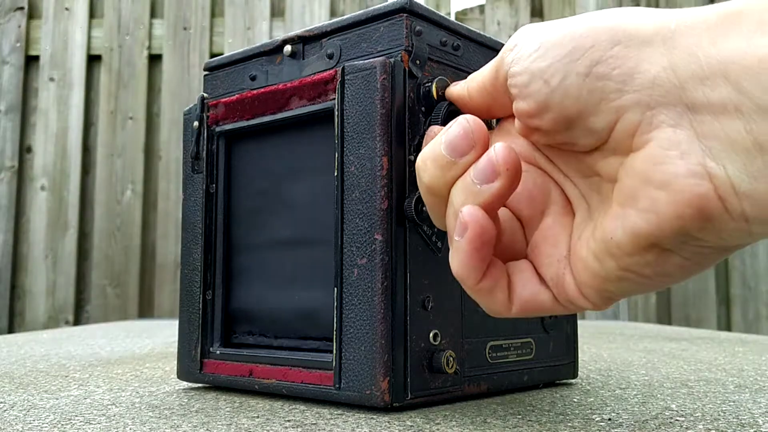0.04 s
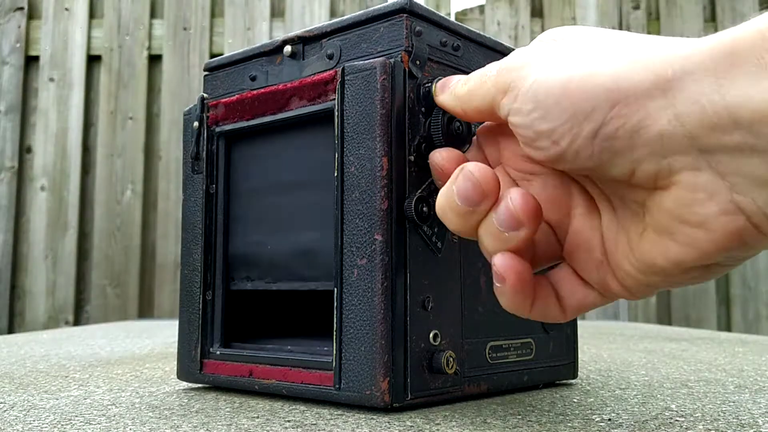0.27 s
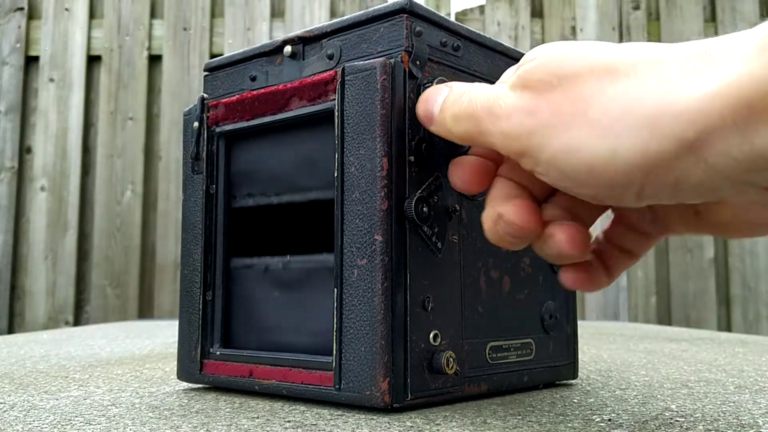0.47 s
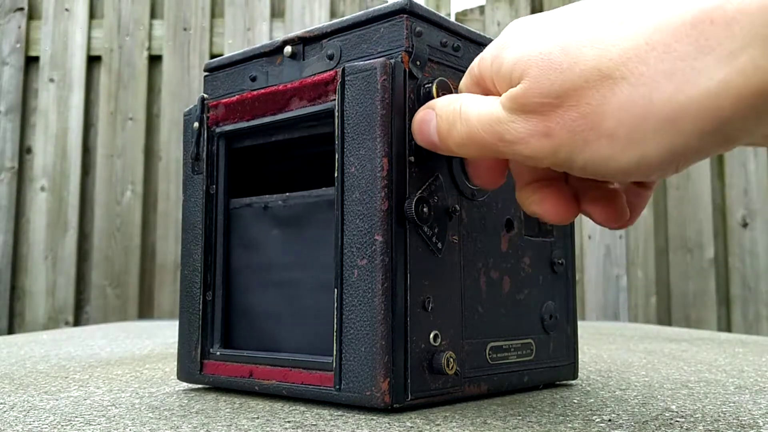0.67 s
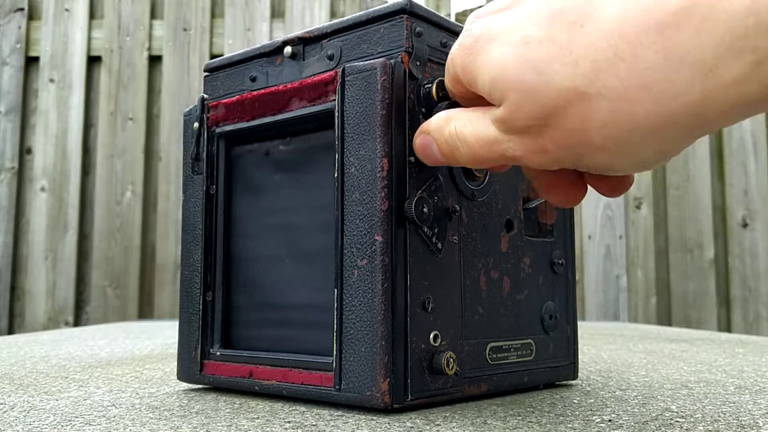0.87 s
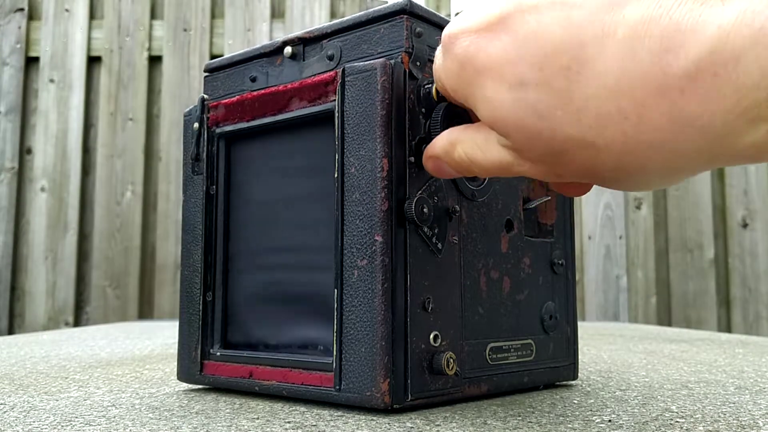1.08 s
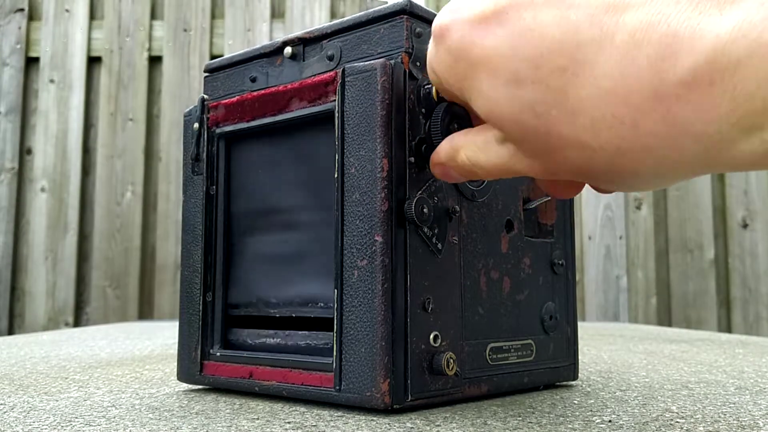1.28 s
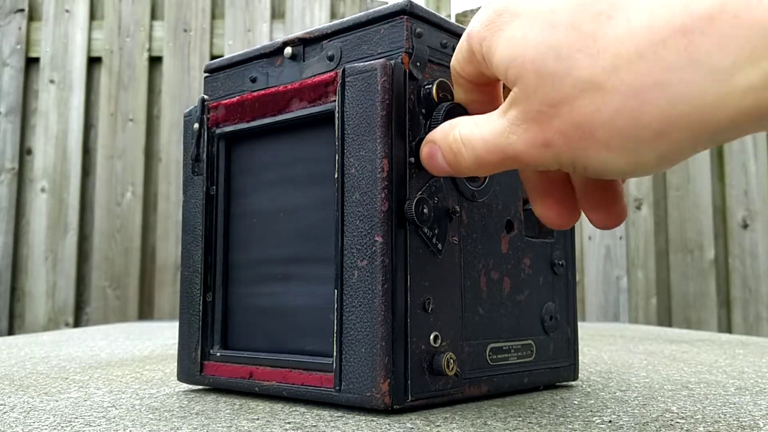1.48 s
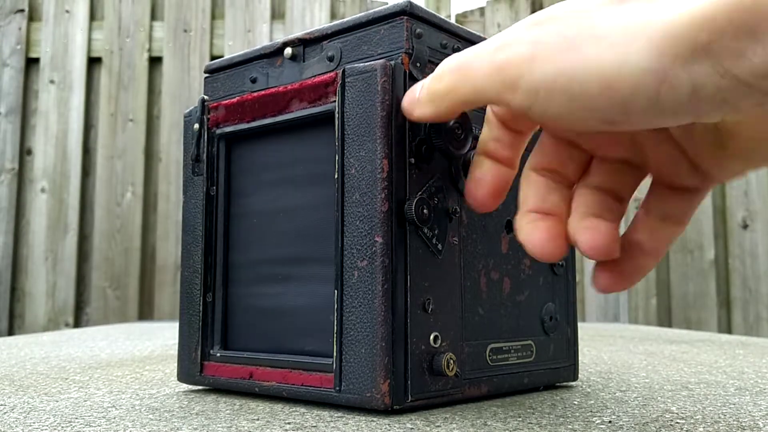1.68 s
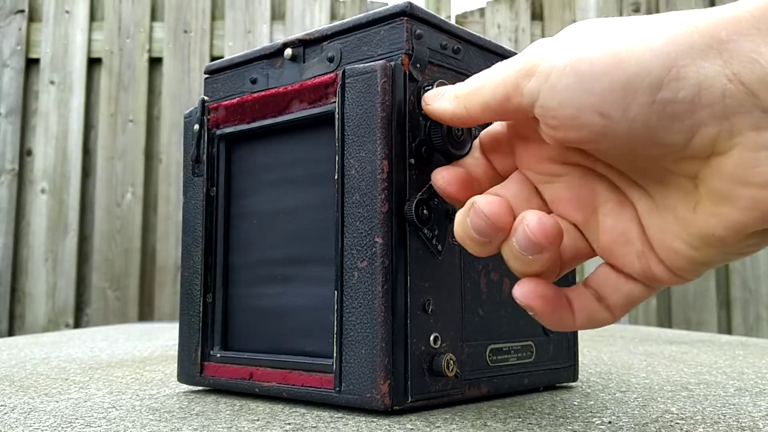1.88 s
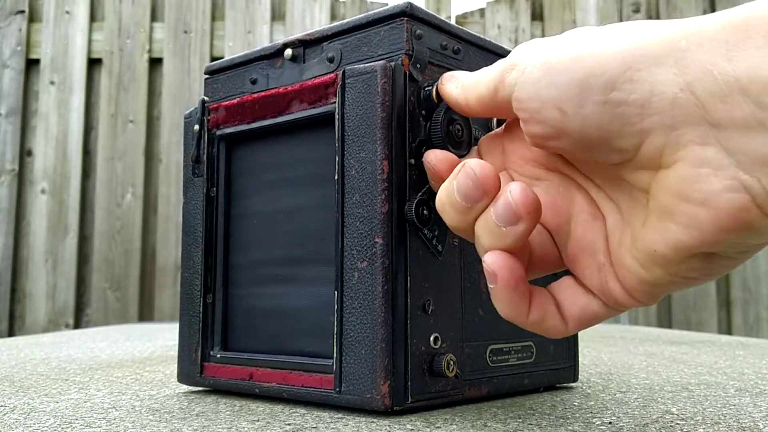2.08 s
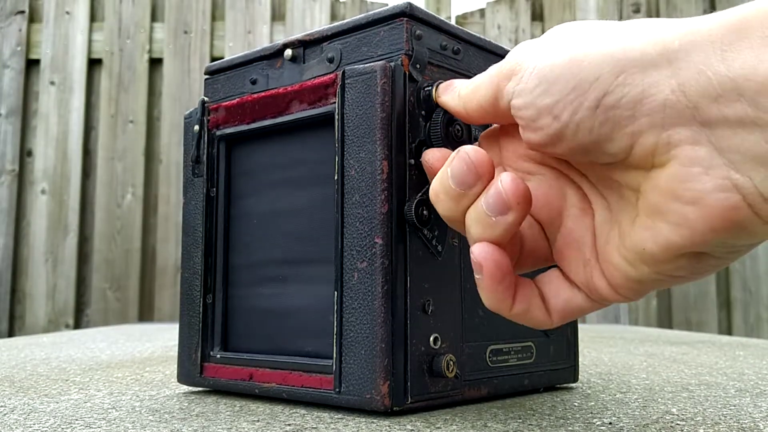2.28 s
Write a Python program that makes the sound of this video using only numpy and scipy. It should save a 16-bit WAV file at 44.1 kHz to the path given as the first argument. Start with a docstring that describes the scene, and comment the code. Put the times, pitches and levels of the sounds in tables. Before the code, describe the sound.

An old camera's shutter is wound close by, outdoors. A faint squeak at 0.2 seconds leads into light, uneven ratchet ticks, with sharp metal clicks near 0.7 and 1.15 seconds. Around 1.45 seconds the cloth curtain runs down with a rustle, a gear rattle and a hollow clack. Wind thumps the microphone, mostly on the left, strongest from 1 to 1.4 seconds, then briefly on the right near 2.1.

```python
"""Outdoors, close to the microphone, a hand winds the cloth curtain shutter of an old box camera.
The key squeaks faintly, the ratchet ticks, and its metal catch (the pawl) clacks into its stops.
At last the curtain runs down: cloth rubs, gears rattle and the hollow wooden box takes a knock.
Wind rumbles and thumps on the two microphone openings, mostly the left, over a distant wash."""
import sys
import numpy as np
from scipy import signal
from scipy.fft import rfft, irfft
from scipy.io import wavfile
from scipy.ndimage import uniform_filter1d

SR = 44100
rng = np.random.default_rng(int(sys.argv[2]) if len(sys.argv) > 2 else 0)


def bounce(signal):
    """Save signal as a 16-bit WAV file at the path given by the first command-line argument."""
    frames = np.transpose(np.atleast_2d(signal))
    limited = np.clip(frames, -1, 1)
    pcm = np.round(limited * 32767).astype(np.int16)
    wavfile.write(sys.argv[1], SR, pcm)


N = 108045

# each clack: t/s, level/dB, treble tilt/(dB per octave), f/Hz, left minus right/dB, box knock/dB
PAWL_HITS = [(0.671, -15, 0.35, 3200, -1.5, -62), (0.9655, -31, 0, 4340, -7, -61),
             (1.148, -21.5, 3, 11300, 3, -49), (1.1515, -17.5, 0, 7060, -3, -38),
             (1.2612, -27, -1, 8100, -4, -43), (1.4674, -23.5, 0.5, 5060, -2, -32)]
# the tone of a clack: f/Hz, level/dB
PAWL_TONE = [(200, -26), (600, 11), (1100, 3.5), (3000, 9.5), (4000, 3), (9200, 6), (10500, -3),
             (16000, -5)]
def pawl():
    """The catch drops into its stops hard enough to ring the metal side plate."""
    out = np.zeros((2, N))
    for start, db, tilt, hz, pan, _ in PAWL_HITS:
        clack = contact(start, db, hz, PAWL_TONE, 0.00057, decay_s=0.0015, tilt_db=tilt, ring_db=-16.5)
        out += panned(clack, pan)
    return out


# ringing notes of the side plate and gears: f/Hz, level/dB, time to fade by 60 dB/s
PLATE_NOTES = [(1352, -1, 0.12), (1804, 9.5, 0.022), (2320, 7, 0.052), (2392, 10.5, 0.038),
               (3000, -15, .03), (3390, -2.5, 0.025), (4726, 14, 0.02), (5900, 10, 0.01),
               (7040, -8, 0.0074), (8200, 12.5, 0.0054), (9280, 15.5, 0.0078), (12230, 18, 0.0034)]
def contact(start, db, part_hz, tone, attack_s, decay_s=0.0013, tilt_db=0, ring_db=-np.inf):
    """Metal hits metal: a tiny burst of noise, then loose gears chatter. Hard hits ring the plate."""
    size, lead = 8192, 128  # samples
    t = np.arange(size) / SR
    hz = np.arange(size // 2 + 1) * SR / size + 1
    rise = (1 - np.exp(-t / attack_s)) ** 2
    chatter = undb(-25) * np.exp(-t / 0.014)
    envelope = rise * (np.exp(-t / decay_s) + chatter)
    burst = rfft(stereo_noise(size) * envelope)
    burst /= np.sqrt(uniform_filter1d(np.abs(burst) ** 2, size=200, axis=1) + 1e-12)  # even out the tone
    # each blow lands on a new spot, so the plate's notes get a new balance
    notes = [(f, level + 3 * rng.standard_normal(), fade) for f, level, fade in PLATE_NOTES]
    tone_hz, tone_db = np.array(tone, float).T
    body = unit(undb(np.interp(np.log(hz), np.log(tone_hz), tone_db)))
    body = body + undb(ring_db) * unit(rfft(ring(notes), size))
    part = undb(6 * np.exp(-(np.log2(hz / part_hz) / 0.16) ** 2))  # the struck part favours its own pitch
    tilt = undb(tilt_db * np.log2(np.maximum(hz, 500) / 4000))
    hit = np.roll(irfft(burst * body * part * tilt), lead, axis=1)
    hit = unit(hit) * np.sqrt(0.003 * SR / size) * undb(db)  # level as if packed into 3 ms
    return np.pad(hit, ((0, 0), (int(start * SR) - lead, N)))[:, :N]


# each tooth of the ratchet: t/s, level/dB, f/Hz
TOOTH_HITS = [(0.2113, -37, 5700), (0.344, -41, 5800), (0.3674, -36.5, 7900), (.422, -37, 3560),
              (0.4388, -34.5, 4200), (0.457, -38, 6860), (0.5034, -34.5, 7000), (0.517, -31, 5500),
              (0.533, -35, 5700), (0.5568, -31.5, 5600), (0.5744, -35.5, 7200), (0.588, -34, 2980),
              (0.633, -34, 9100), (0.64, -42, 3200), (0.8386, -43, 6000), (0.885, -37, 4230),
              (1.039, -37, 5330), (1.062, -37.5, 6100), (1.246, -32.5, 5550)]
# the tone of a light tick: f/Hz, level/dB
TOOTH_TONE = [(300, 5.5), (900, 5.5), (3700, -2), (8800, -5.5), (10500, -16.5), (16000, -20)]
def ratchet():
    """The teeth tick lightly as the winding key turns, each with its own pitch."""
    ticks = sum(contact(start, db, hz, TOOTH_TONE, attack_s=0.0006) for start, db, hz in TOOTH_HITS)
    return panned(ticks, pan_db=-5.5)


# each hit in the rattle of the gears: t/s, level/dB
GEAR_RATTLE = [(1.4363, -34), (1.4409, -27.5), (1.4473, -40), (1.4568, -27), (1.4635, -31), (1.4745, -34.5),
               (1.488, -41)]
def gears():
    """The released gears rattle in a quick run of hits as the curtain runs down."""
    hits = sum(contact(start, db, part_hz=6400, tone=TOOTH_TONE, attack_s=0.00053)
               for start, db in GEAR_RATTLE)
    return panned(hits, pan_db=-5.5)


# each rub of the curtain: t/s, rise/s, hold/s, fall/s, level/dB
CLOTH_RUBS = [(0.514, 0.012, 0.04, 0.053, -40.5), (0.849, 0.026, 0.012, 0.02, -41),
              (1.422, 0.025, 0.029, 0.022, -33)]
# the tone of the rubbing: f/Hz, level/dB
CLOTH_TONE = [(200, -1.5), (600, 3), (1900, -2.5), (8500, -19.5), (11500, -36)]
def curtain(catches_per_s=2000, spread_db=0.5):
    """The cloth and its roller catch and slip so often that it blurs into a rustle."""
    effort = sum(undb(db) * np.interp(times(), start + np.cumsum([0, rise, hold, fall]), [0, 1, 1, 0])
                 for start, rise, hold, fall, db in CLOTH_RUBS)
    catches = rng.random(N) < catches_per_s / SR
    strength = undb(spread_db * np.minimum(rng.exponential(size=N), 4))
    rustle = colour(stereo_noise(N) * catches * strength, gain_at(CLOTH_TONE))
    return panned(unit(rustle) * effort, pan_db=-5.5)


# ringing notes of the wooden box: f/Hz, level/dB, time to fade by 60 dB/s
BOX_NOTES = [(338, -7.5, 0.26), (379, 0.5, 0.24), (460, 7.5, 0.039), (749, -3.5, 0.12),
             (1480, -11.5, 0.078)]
def box():
    """Each clack knocks the hollow box, hardest when the curtain stops."""
    knock = ring(BOX_NOTES)
    return sum(undb(db) * np.pad(knock, (int(start * SR), N))[:N] for start, *_, db in PAWL_HITS)


# the path of the squeak: t/s, f/Hz, level/dB
SQUEAK_PATH = [(.12, 1973, -61), (.168, 2050, -57), (.195, 2354, -51), (0.321, 2440, -57)]
def squeak():
    """As the winding starts, a thin, shaky squeak climbs in pitch and fades."""
    when, hz, db = np.array(SQUEAK_PATH).T
    t = times()
    wobble = unit(uniform_filter1d(rng.standard_normal(N), size=200))
    pitch = np.interp(t, when, hz) * (1 + 0.0524 * wobble)
    loudness = undb(np.interp(t, when, db, left=-np.inf, right=-np.inf))
    return np.sin(2 * np.pi * np.cumsum(pitch) / SR) * loudness


# gusts on the left and on the right opening: t/s, level/dB
LEFT_GUSTS = [(0, -41.5), (.13, -33), (.39, -34), (.51, -25), (.6, -39.5), (.74, -32), (.78, -23.5),
              (.94, -23), (1.12, -16), (1.38, -24.5), (1.56, -44), (2.45, -50.5)]
RIGHT_GUSTS = [(0, -40.5), (1.95, -50), (2.06, -25), (2.13, -44), (2.173, -21), (2.26, -63), (2.45, -50)]
# the tone of the wind's rumble: f/Hz, level/dB
WIND_TONE = [(25, -67.5), (45, 0.5), (90, 4), (220, -11), (400, -29.5), (8000, -86)]
# single swirls of air that thump the left opening: t/s, peak level/dB, f/Hz
SWIRLS = [(0.24, -18.5, 73), (.426, -17.5, 80), (0.5, -19.5, 163), (0.837, -22, 171), (.886, -22, 161),
          (.916, -17, 136), (0.9987, -6.5, 86), (1.0619, -4.5, 155), (1.170, -3.5, 120),
          (1.2644, -5.5, 131), (1.389, -10, 81)]
def wind():
    """Churning air rumbles on each microphone opening; a single swirl pulls and pushes once."""
    t = times()
    churn = colour(rng.standard_normal((2, N)), gain_at(WIND_TONE))
    churn /= np.sqrt(uniform_filter1d(churn ** 2, size=2600, axis=1))  # steady, so gusts set the level
    out = churn * undb([np.interp(t, *np.array(gusts).T) for gusts in (LEFT_GUSTS, RIGHT_GUSTS)])
    for centre, db, hz in SWIRLS:
        phase = 2 * np.pi * hz * (t - centre)
        out[0] += undb(db) * phase * np.exp((1 - phase ** 2) / 2)
    return out


def fence_echo(x, delay_s=0.0038, decay_s=0.045, level_db=-22.5):
    """Sound bounces off the yard fence and gains a faint tail."""
    t = times()[:SR // 2]
    late = np.maximum(t - delay_s, 0)
    tail = rng.standard_normal((2, len(t))) * (late > 0) * np.exp(-late / decay_s)
    tail = undb(level_db) * unit(tail) / np.sqrt(len(t))
    return x + signal.fftconvolve(x, tail, axes=1)[:, :N]


# the tone of the distant outdoors: f/Hz, level/dB
WASH_TONE = [(30, -19), (55, 0.5), (90, 0.5), (150, -8.5), (400, -15), (800, -14), (2000, -24.5),
             (3200, -33), (10500, -47), (15000, -51)]
def distant_wash(level_db=-40.5, flicker_db=0.5, alike_below_hz=433):
    """A soft, faraway noise that flickers slightly; its bass is alike on both sides."""
    hz = np.arange(N + 1) * SR / (2 * N)
    share = 0.99 / (1 + (hz / alike_below_hz) ** 4)
    noise = rfft(rng.standard_normal((3, 2 * N)))
    both_sides = np.sqrt(share) * noise[0] + np.sqrt(1 - share) * noise[1:]
    wash = unit(irfft(both_sides * gain_at(WASH_TONE))[:, :N])
    flicker = unit(uniform_filter1d(uniform_filter1d(rng.standard_normal(N), size=3000), size=3000))
    return wash * undb(level_db - flicker_db * flicker)


# how much louder the camera is on the left than on the right: f/Hz, level/dB
SIDE_BALANCE = [(2300, 5), (7500, -5), (9200, -3.5), (13000, 7)]
def microphone(camera):
    """Each opening gives the camera a different tone; the left hears it one sample later."""
    balance = np.sqrt(gain_at(SIDE_BALANCE))
    left = np.roll(colour(camera[0], balance), 1)
    right = colour(camera[1], 1 / balance)
    return np.array([left, right])


def undb(db):
    """Turn decibels into a multiplier."""
    return 10 ** (np.asarray(db) / 20)


def unit(x):
    """Scale to an average (rms) level of 1."""
    return x / np.sqrt(np.mean(x ** 2) + 1e-30)


def times():
    """The time of each sample in seconds."""
    return np.arange(N) / SR


def gain_at(points):
    """Join (f/Hz, level/dB) points into a multiplier for every frequency."""
    hz, db = np.array(points, float).T
    return undb(np.interp(np.log(np.arange(N + 1) * SR / (2 * N) + 1), np.log(hz), db))


def colour(x, gain):
    """Change the tone of x without smearing any sound earlier in time."""
    cepstrum = irfft(np.log(gain + 1e-9))
    cepstrum[1:N] *= 2
    cepstrum[N + 1:] = 0
    return irfft(rfft(x, 2 * N) * np.exp(rfft(cepstrum)))[..., :N]


def ring(notes):
    """A struck object rings with pure notes that die away."""
    t = times()[:SR // 2]
    return sum(undb(db) * np.sin(2 * np.pi * hz * t) * np.exp(-np.log(1000) * t / fade_s)
               for hz, db, fade_s in notes)


def panned(x, pan_db):
    """Place a sound to one side; pan_db is left minus right."""
    return x * undb(np.array([[pan_db], [-pan_db]]) / 2)


def stereo_noise(size, share=0.31):
    """Noise that is partly shared by left and right."""
    noise = rng.standard_normal((3, size))
    return np.sqrt(share) * noise[0] + np.sqrt(1 - share) * noise[1:]


def scene():
    """The camera and its echo reach the microphone, along with wind and the distant wash."""
    camera = ratchet() + pawl() + gears() + curtain() + box() + squeak()
    return microphone(fence_echo(camera)) + wind() + distant_wash()


def record(dry, low_hz=37.5, top_hz=16000):
    """Cut away the deepest bass and the highest treble."""
    dry = signal.sosfiltfilt(signal.butter(2, low_hz, "high", fs=SR, output="sos"), dry)
    return signal.sosfilt(signal.ellip(8, .2, 80, top_hz, fs=SR, output="sos"), dry)


dry = scene()
out = record(dry)
bounce(out)
```